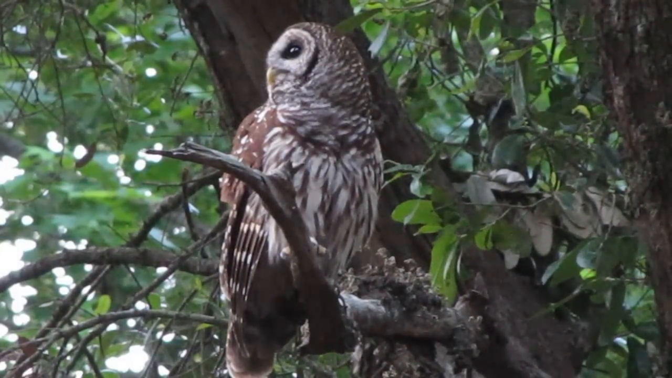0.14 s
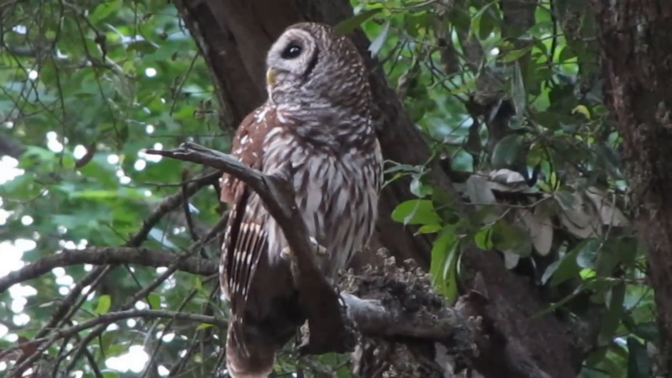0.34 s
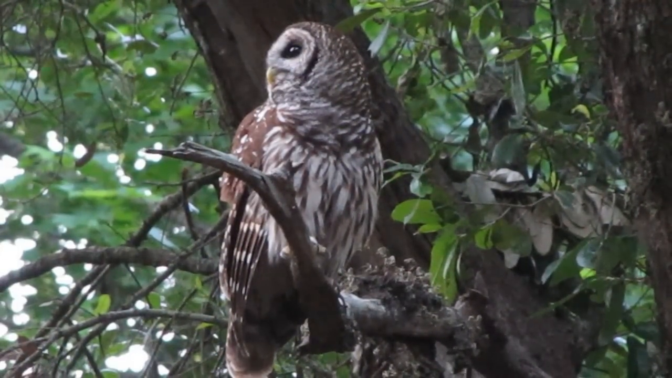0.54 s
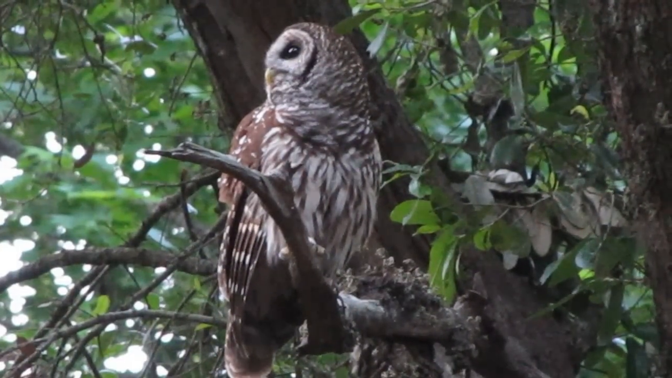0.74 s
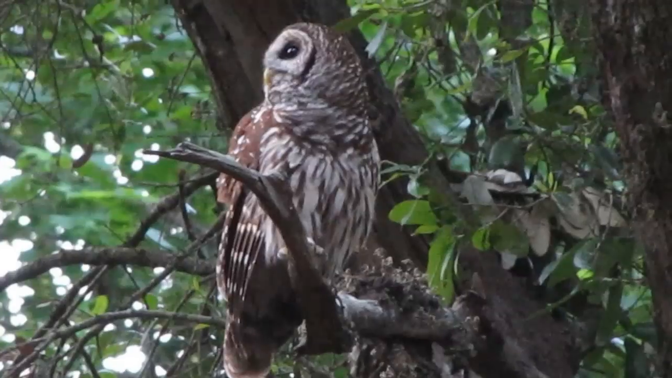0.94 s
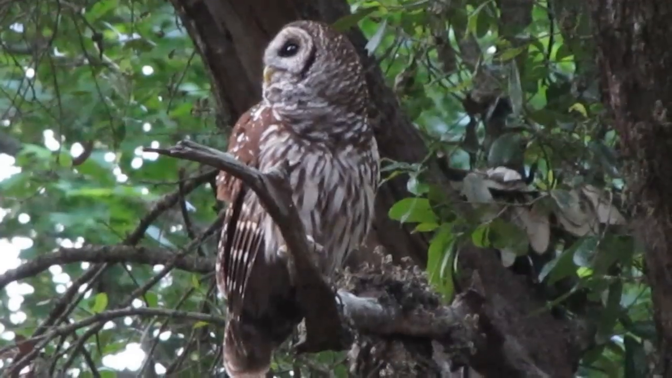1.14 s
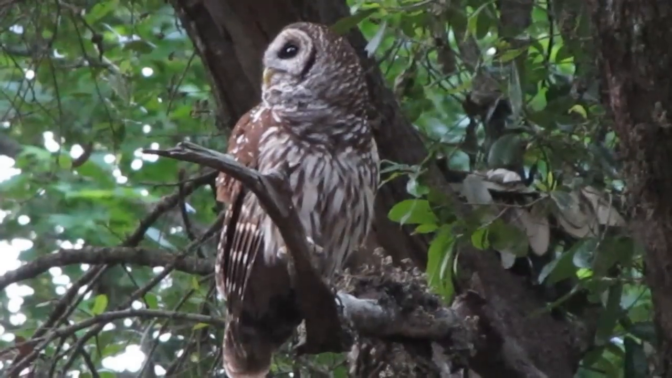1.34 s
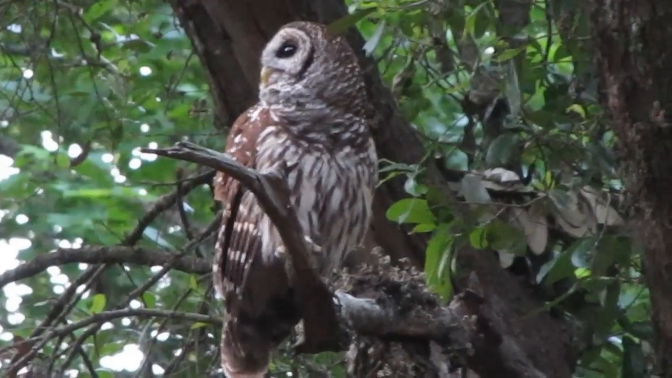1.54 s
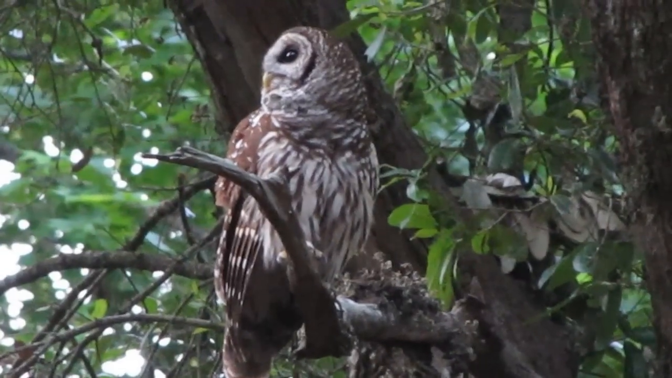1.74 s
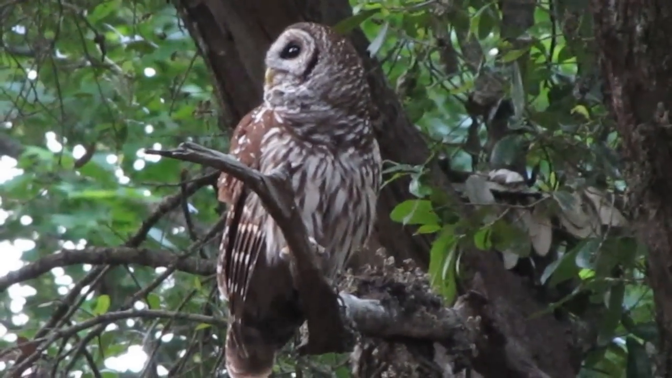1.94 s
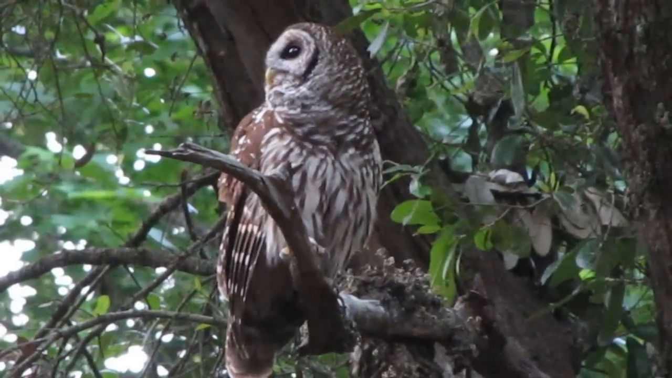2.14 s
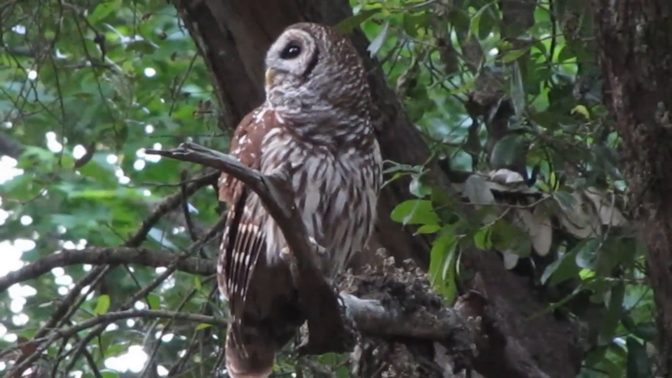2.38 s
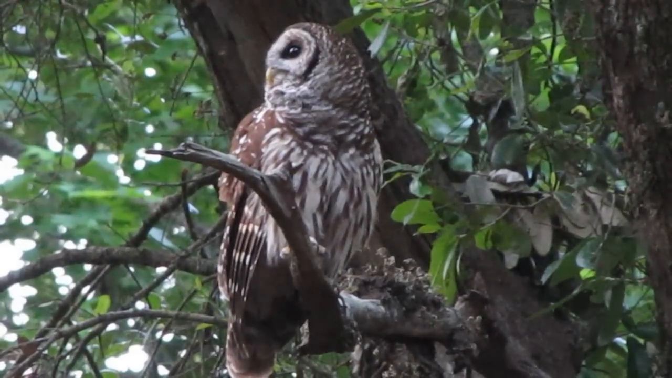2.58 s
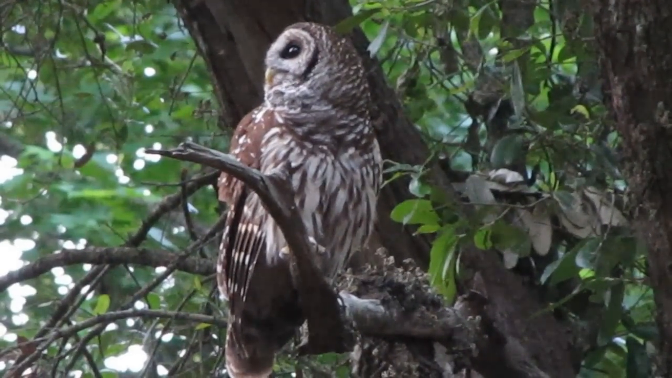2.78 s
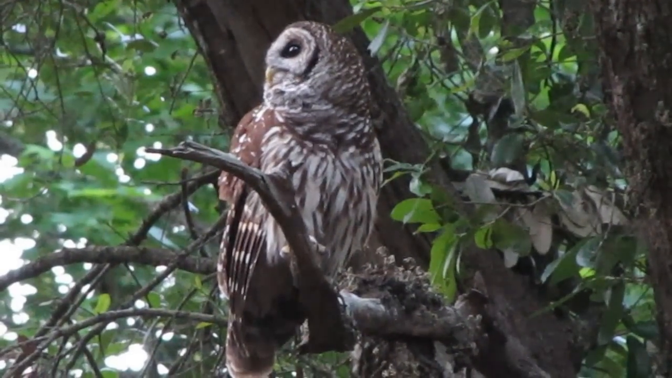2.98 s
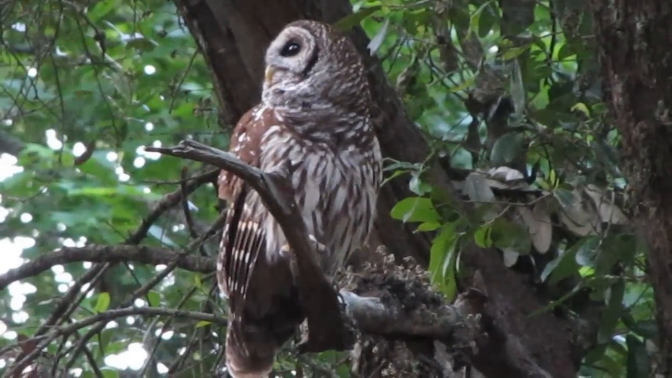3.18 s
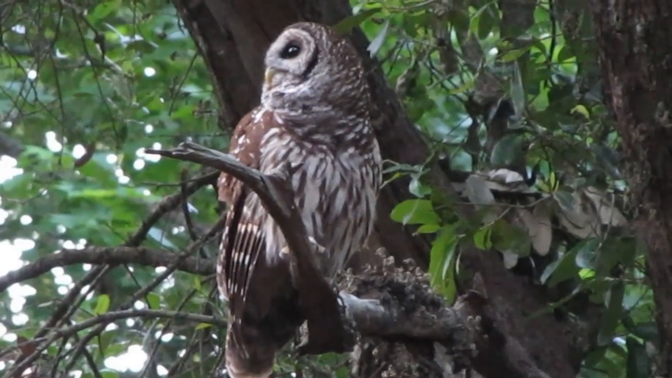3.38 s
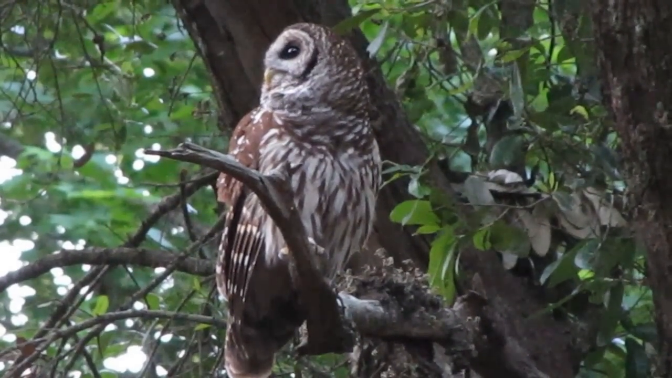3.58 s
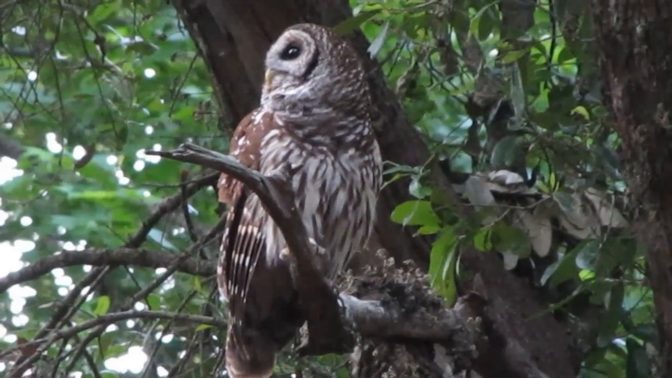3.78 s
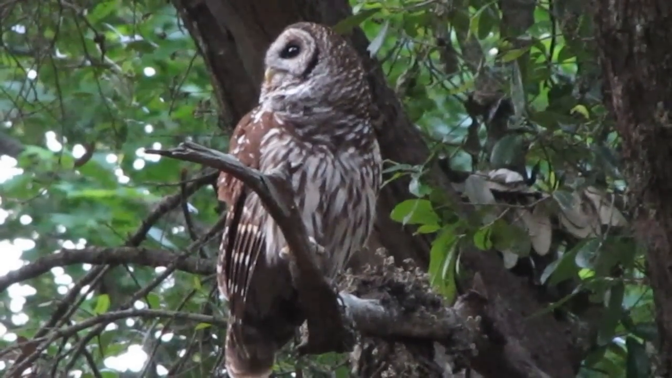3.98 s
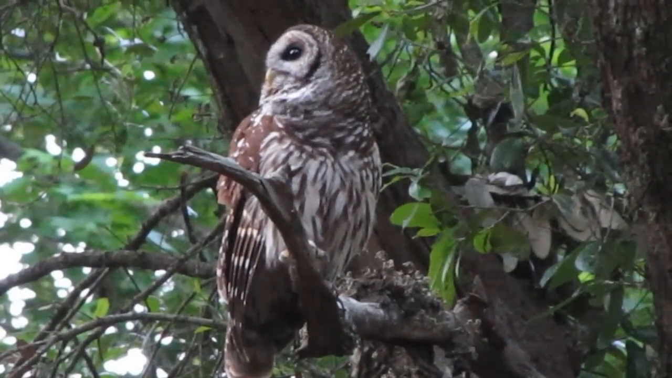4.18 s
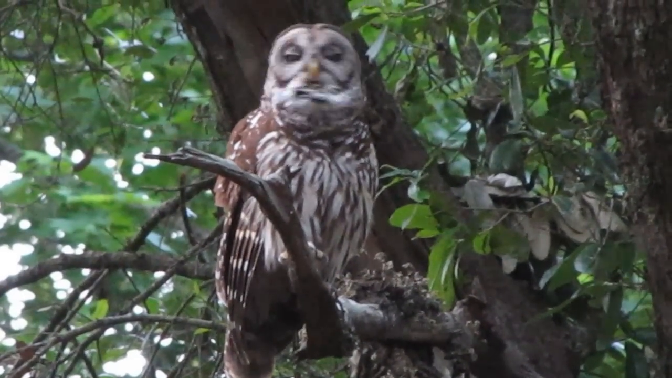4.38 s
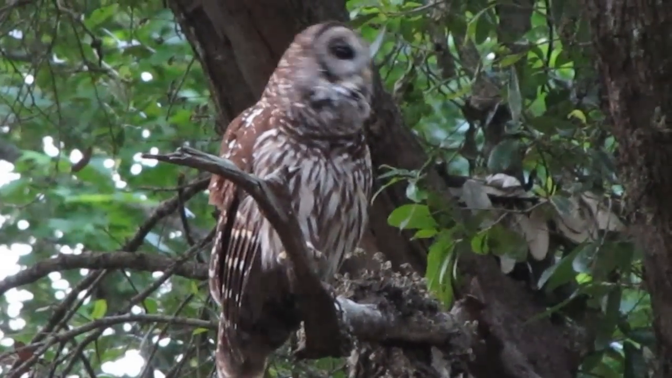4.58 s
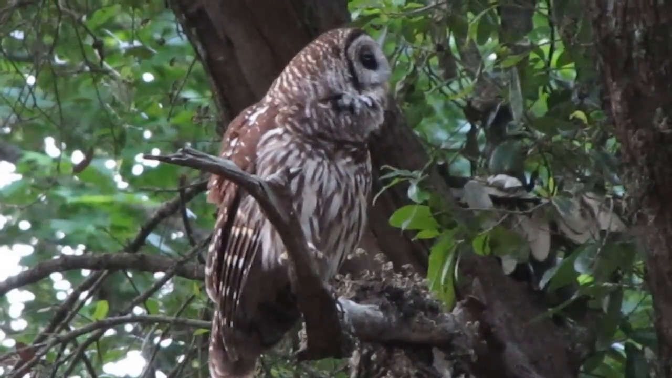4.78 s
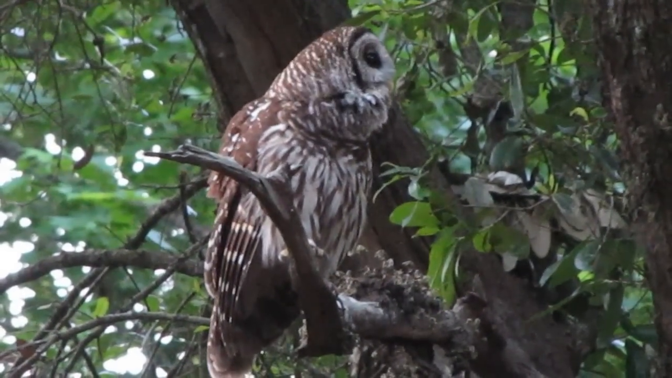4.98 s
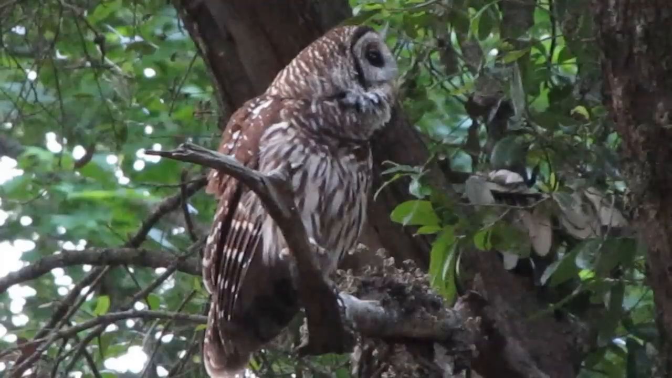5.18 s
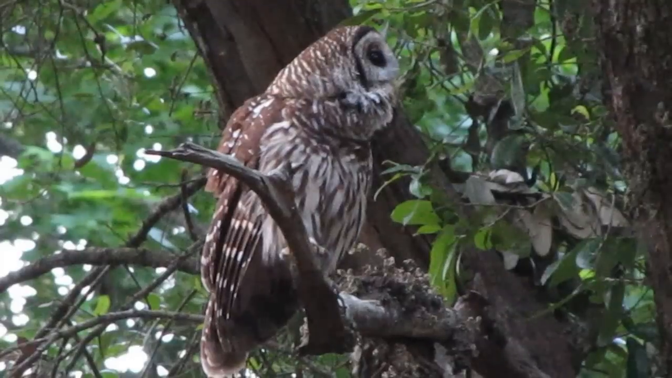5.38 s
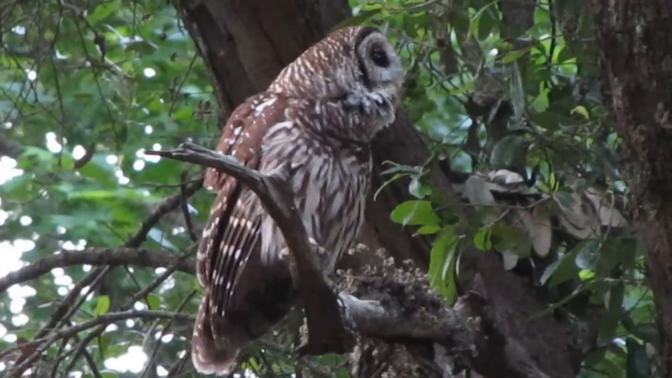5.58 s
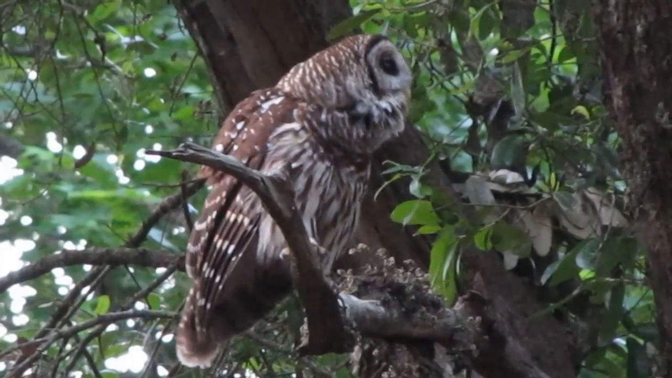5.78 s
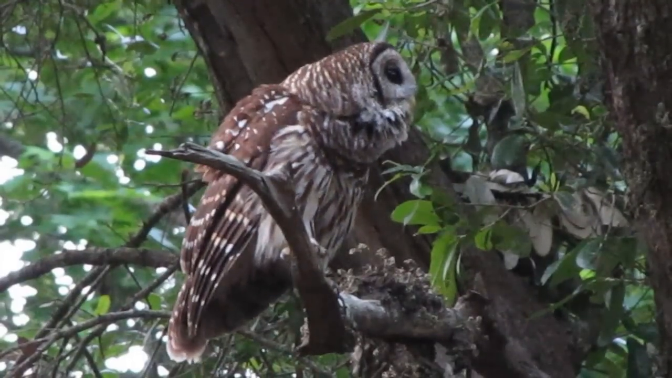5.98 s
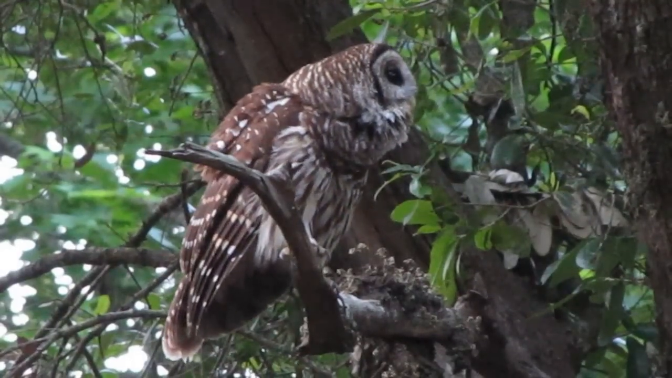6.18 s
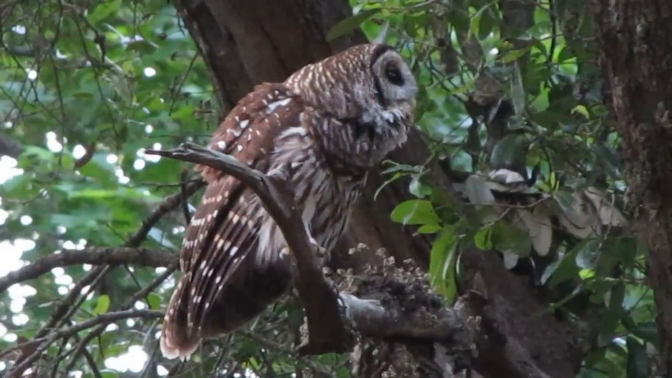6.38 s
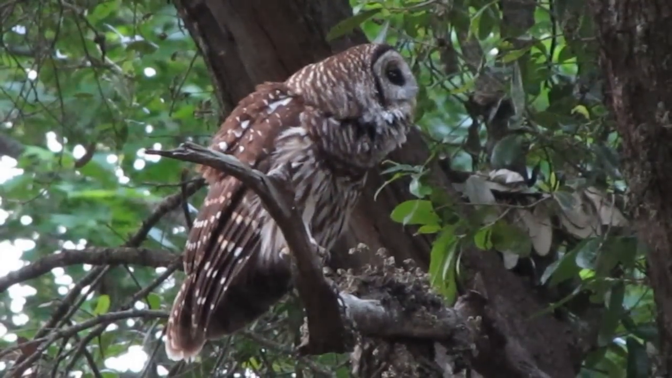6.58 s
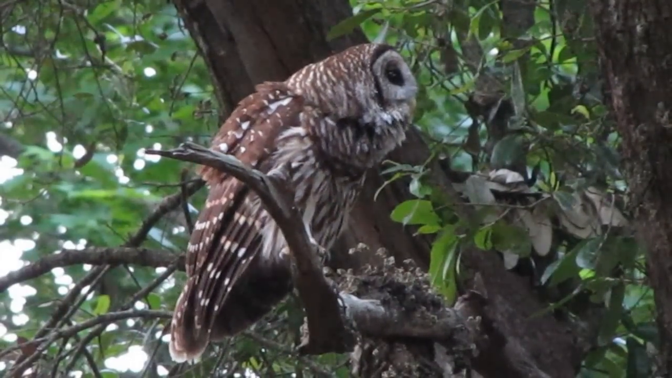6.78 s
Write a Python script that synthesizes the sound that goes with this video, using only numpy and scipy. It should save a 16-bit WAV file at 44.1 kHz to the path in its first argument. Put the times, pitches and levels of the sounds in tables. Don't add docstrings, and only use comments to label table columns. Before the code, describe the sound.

Outdoor stereo pickup among trees: continuous high insect buzz, soft air hiss and low far traffic. Short squirrel clucks come first, then clusters of bright bird chips, small wooden taps and leaf rustles. Harsh distant calls and thin whistles grow busier in the middle. A perched owl then hoots once, loud and nearly pure, cracking and sliding down into a fluttering coo, with scattered woodland echoes trailing afterward.

```python
import sys
import numpy as np
from scipy import signal
from scipy.fft import rfft, irfft
from scipy.io import wavfile
from scipy.ndimage import map_coordinates

SR = 44100
rng = np.random.default_rng(int(sys.argv[2]) if len(sys.argv) > 2 else 0)


def int16_out(signal):
    q = np.round(np.clip(np.atleast_2d(signal).T, -1, 1) * 32767)
    wavfile.write(sys.argv[1], SR, q.astype(np.int16))


def boost(x):
    u = np.asarray(x, float) / 20
    return 10 ** u


N = 301203
CLOCK = np.arange(N) / SR


def in_time(rows):
    s, *columns = np.transpose(rows)
    return [np.interp(CLOCK, s, c) for c in columns]


def at_hz(points, hz):
    table_hz, values = np.array(points)[:, 0], np.array(points)[:, 1]
    return np.interp(np.log(hz + 1), np.log(table_hz + 1), values)


def moment(centre_s, half_s, power=2):
    return np.exp(-((CLOCK - centre_s) / half_s) ** power)


def rms_one(x):
    return x / np.sqrt(np.mean(x ** 2) + 1e-20)


def drift(rate):
    knots = rng.standard_normal(int(N / SR * 200) + 2)
    return rms_one(map_coordinates(knots, [CLOCK * min(rate, 190)], order=3))


def cycle(hz):
    return np.sin(2 * np.pi * np.cumsum(hz) / SR)


def colour(x, spectrum):
    hz = np.arange(N // 2 + 1) * SR / N
    inside = (hz > spectrum[0][0]) & (hz < spectrum[-1][0])
    return rms_one(irfft(rfft(x) * boost(at_hz(spectrum, hz)) * inside, N))


def wide_noise(spectrum):
    # freq_hz, likeness [0-1]
    likeness = [(60, .93), (130, .75), (280, .5), (620, .45), (1340, .4), (2900, .15), (6000, .01),
                (14000, .01)]
    alike = np.clip(at_hz(likeness, np.arange(N // 2 + 1) * SR / N), 0, .99)
    mid, side = rfft(rng.standard_normal((2, N)))
    spread = np.sqrt(1 - alike) * side * [[1], [-1]]
    pair = colour(irfft(np.sqrt(1 + alike) * mid + spread, N), spectrum)
    return pair / np.std(pair.mean(axis=0))


def pan(x, db):
    return x * boost(np.array([[db / 2], [-db / 2]]))


def add(out, sound, s):
    i = max(round(s * SR), 0)
    out[..., i:i + sound.shape[-1]] += sound[..., :N - i]


def sweep(times, pitches, edge_s):
    t = np.arange(times[0], times[-1], 1 / SR)
    fade = np.clip(np.minimum(t - t[0], t[-1] - t) / edge_s, 0, 1)
    return np.sin(fade * np.pi / 2) * np.sin(2 * np.pi * np.cumsum(np.interp(t, times, pitches)) / SR)


def ring(hz, t60, rise_s):
    t = np.arange(SR // 10) / SR
    return np.sin(2 * np.pi * hz * t) * boost(-60 * t / t60) * (1 - np.exp(-t / rise_s))


def trees(x, t60, first_s, patchy, alike=0.19):
    t = np.arange(SR) / SR
    shared, *own = rng.standard_normal((3, SR)) * rng.exponential(1, (3, SR)) ** patchy
    echoes = np.sqrt(alike) * shared + np.sqrt(1 - alike) * np.array(own)
    echoes = echoes * boost(-60 * t / t60) * (t > first_s)
    echoes /= np.sqrt(np.sum(echoes ** 2, axis=1, keepdims=True))
    mono = np.atleast_2d(x).mean(axis=0, keepdims=True)
    return signal.fftconvolve(mono, echoes)[:, :N]


def owl():
    # time_s, pitch_hz
    glide = [(5.67, 669.6), (5.81, 685), (6.16, 661.4), (6.27, 645), (6.372, 566.6), (6.415, 539.2),
             (6.446, 388), (6.54, 338.8), (6.66, 312.2), (6.76, 276), (6.83, 210)]
    # time_s, effort_db
    effort = [
        (5.64, -40),
        (5.69, -28.5),
        (5.93, -22),
        (6.26, -22),
        (6.395, -17.5),
        (6.403, -18.5),
        (6.445, -21.5),
        (6.51, -27),
        (6.83, -45.5),
    ]
    # time_s, roughness [0-1]
    roughness = [
        (5.6, .02),
        (6.4, .02),
        (6.44, .3),
        (6.83, .35),
    ]
    # freq_hz, level_db
    throat = [(220, 3), (340, -1.5), (650, 0.5), (1000, -14.5), (1340, -30), (1900, -20.5), (2550, -20.5),
              (2950, -26.5), (3350, -29), (4800, -48)]
    (pitch,), (effort_db,), (rough,) = in_time(glide), in_time(effort), in_time(roughness)
    scoop_hz_per_s = 3500
    pitch = pitch - scoop_hz_per_s * np.clip(glide[0][0] - CLOCK, 0, .1)
    flutter = np.sin(2 * np.pi * np.cumsum(24 * (1 + 0.22 * drift(6.6))) / SR) + 0.38 * drift(60)
    phase = 2 * np.pi * np.cumsum(pitch * (1 + .06 * rough * flutter)) / SR

    overtones_db, follow, coo_db = -21.5, 0.36, -17.5
    voice_break = moment(6.421, .006)
    upper_db = overtones_db + follow * (effort_db - overtones_db) + coo_db * rough - 11 * voice_break
    levels = []
    for k in range(1, 12):
        source_db = upper_db if k > 1 else effort_db
        coo_bright_db = -6 * rough if k > 2 else 0
        levels.append(source_db + at_hz(throat, k * pitch) + coo_bright_db)
    levels[0] = levels[0] - 18 * rough - 6 * voice_break - 6.5 * moment(5.974, 0.016)
    levels[2] = levels[2] - 25 * np.clip((5.705 - CLOCK) / .01, 0, 1)
    levels[3:] = [db - 25 * np.clip((5.79 - CLOCK) / 0.05, 0, 1) for db in levels[3:]]

    voice = np.zeros(N)
    for k, db in enumerate(levels, 1):
        wobble_db = 11 * rough * np.tanh(drift(28))
        voice += boost(db + 2.5 + wobble_db) * np.sin(k * phase)
    voice += boost(levels[1] - 9) * rough * (1 + drift(50)) * np.sin(3 * phase / 2)
    voice *= np.clip((CLOCK - 5.632) / 0.033, 0, 1)
    return pan(voice, .3) + boost(-12.5) * trees(voice, 1.8, 0.013, patchy=0.55, alike=0.97)


def songbird():
    # top_s, from_hz, # top_hz, end_hz, level_db
    chips = [(0.004, 4200, 5180, 4060, -37), (0.032, 1513, 3770, 1690, -30),
             (2.116, 2990, 4870, 5000, -31.5), (2.16, 4500, 4980, 4750, -38), (2.19, 4600, 4950, 4800, -41),
             (2.305, 4700, 5140, 5000, -44), (2.34, 4780, 5070, 4950, -43), (2.209, 2890, 4480, 2710, -28),
             (2.274, 1496, 3956, 5200, -29), (2.331, 2360, 3490, 3300, -35.5),
             (2.356, 1616, 3940, 1780, -27), (2.457, 1390, 3586, 1640, -31.5),
             (4.542, 4200, 5270, 4800, -26), (4.546, 4940, 5600, 5500, -33), (4.6, 4750, 5080, 5000, -36),
             (4.623, 1500, 4470, 2170, -26.5), (4.702, 1486, 3466, 1660, -26.5),
             (4.783, 1816, 3060, 2650, -36), (4.832, 1815, 3410, 2110, -32.5)]
    climb_hz_per_s, fall_s, hold_s_per_khz = 300000, 0.007, 0.003
    dwell_s, shoulder = .0025, .12
    out = np.zeros(N)
    for s, from_hz, top_hz, end_hz, db in chips:
        rise = min((top_hz - from_hz) / climb_hz_per_s, s)
        fall = fall_s + hold_s_per_khz * max(end_hz / 1000 - 3.5, 0)
        times = [s - rise, max(s - dwell_s, s - rise / 2), s, s + dwell_s, s + fall + dwell_s]
        up, down = from_hz - top_hz, end_hz - top_hz
        pitches = top_hz + np.array([up, shoulder * up, 0, shoulder * down, down])
        swell_points = boost(np.array([-11, -4, 0, 0, -1]))
        swell = np.interp(np.arange(times[0], times[-1], 1 / SR), times, swell_points)
        octave = boost(-20) * sweep(times, 2 * pitches, .003)
        add(out, boost(db) * swell * (sweep(times, pitches, 0.00021) + octave), s - rise)
    bright = signal.sosfilt(signal.butter(2, 3300, "high", fs=SR, output="sos"), out)
    near = boost(4.0) * trees(bright, 0.07, 0.0012, patchy=0.17, alike=0.25)
    far_bright = boost(2.5) * trees(bright, 0.85, 0.018, patchy=0.69)
    far = boost(-8.5) * trees(out, 0.88, 0.012, patchy=0.51)
    return pan(out, -3.5) + near + far_bright + far


def cricket():
    # start_s, pulses [count], level_db
    trills = [
        (.15, 24, -39),
        (1.849, 23, -39),
        (3.392, 23, -39),
        (5.053, 25, -39),
        (6.72, 4, -39),
    ]
    strokes_per_s, stroke_s = 27.38, .009
    stroke = sweep([0, stroke_s], [5900, 5500], 0.0038)
    out = np.zeros(N)
    for s, pulses, db in trills:
        for k, (chance, late) in enumerate(rng.standard_normal((30, 2))[:round(pulses)]):
            stroke_db = db + 1.5 * chance - 6.5 * np.exp(-k / 2.0)
            add(out, boost(stroke_db) * stroke, s + k / strokes_per_s - stroke_s / 2 + late / 4000)
    return pan(out, 10.4) + boost(-9) * trees(out, 0.058, 0.0011, patchy=4.5)


def squirrel():
    # time_s, peak_db
    stray_clucks = [
        (0.175, -43),
        (1.232, -30.5),
        (1.3067, -31.5),
        (1.4588, -37),
    ]
    start_s, gap_s, slowing_s, hz = .334, .0655, .00025, 1102
    run = [(start_s + gap_s * k + slowing_s * k * k, -38.5 + 1.9 * min(k, 4)) for k in range(13)]
    cluck = ring(hz, 0.012, 0.00035) + boost(-6.5) * ring(1.76 * hz, 0.024, 0.0022)
    out = np.zeros(N)
    for s, db in run + stray_clucks:
        add(out, boost(db + 1.5) * cluck, s)
    return pan(boost(2.5) * out, -1) + boost(-3) * trees(out, .3, .006, patchy=.8)


def knocks():
    # time_s, peak_db, low_mode_hz, left_right_db, crack_db re peak
    blows = [(1.462, -41, 704, -2, -9), (1.801, -46, 710, 5, -3), (1.997, -39, 760, -9, 4),
             (2.715, -29, 794, 5, -8), (3.035, -36.5, 680, -3, 9.5), (3.054, -38, 690, -9, -1),
             (3.417, -38, 726, -3, 7), (3.529, -48, 795, -3, 12), (4.308, -28.5, 736, 6, -21),
             (4.322, -33.5, 640, -1, -2), (4.719, -41, 690, 12, -8), (4.786, -27.5, 676, 2, -22),
             (5.012, -32, 966, -13, -8), (5.7038, -32, 1010, -9, -6)]
    out = np.zeros((2, N))
    decay = boost(-60 * np.arange(600) / SR / 0.03)
    for (s, db, low_hz, side_db, crack_db), noise in zip(blows, rng.standard_normal((len(blows), 600))):
        crack = signal.lfilter([.1, .1, -.1, -.1], [1, -1.7, .77], noise * decay)
        add(out, pan(boost(db) * ring(low_hz, 0.032, 0.000086), side_db), s)
        add(out, pan(boost(db) * ring(1.525 * low_hz, 0.018, 0.00017), side_db), s)
        add(out, pan(boost(db + crack_db + 3) * crack, side_db), s)
    return out + boost(-4.0) * trees(out, 0.033, 0.0061, patchy=1.1)


def bumps():
    # time_s, peak_db, mode_hz
    thumps = [
        (0.898, -41, 274),
        (1.457, -46, 191),
        (1.639, -46, 187),
        (1.996, -48, 161),
        (5.448, -42.5, 305),
    ]
    # time_s, level_db, mode_hz
    tick = (5.7036, -21, 8700)
    out = np.zeros(N)
    for s, db, hz in thumps:
        add(out, boost(db + 2.5) * ring(hz, 0.093, 0.0027), s)
    tick_s, tick_db, tick_hz = tick
    snap = ring(tick_hz, .006, .0002)
    snap = snap + .4 * ring(1.35 * tick_hz, .004, .0002) + .3 * ring(.7 * tick_hz, .004, .0002)
    add(out, boost(tick_db) * snap, tick_s)
    return pan(out, -.5)


def whistlers():
    # start_s, end_s, from_hz, to_hz of the strong fifth partial, level_db
    call_lines = [(.265, 0.296, 2150, 2160, -55), (3.594, 3.628, 2010, 2030, -47),
                  (3.655, 3.79, 1995, 2026, -47.5), (3.845, 3.966, 2130, 2030, -53),
                  (3.972, 4.081, 2010, 1900, -56), (4.175, 4.216, 2090, 2170, -57),
                  (4.235, 4.307, 2170, 2060, -55), (4.313, 4.37, 2210, 1975, -52),
                  (4.379, 4.414, 1900, 2050, -45), (4.415, 4.603, 1920, 1870, -51.5),
                  (4.639, 4.9, 2070, 1890, -47), (4.894, 4.982, 1954, 1990, -53), (4.98, 5.078, 1956, 2045, -51)]
    # multiple [of fundamental], level_db
    call_partials = [
        (4, -9),
        (5, 0),
        (6, -13),
        (7, -11),
    ]
    # start_s, end_s, from_hz, to_hz, level_db
    warbles = [(.001, .022, 1960, 1960, -48.5), (.045, 0.192, 1900, 1834, -58),
               (.09, 0.204, 3120, 3240, -55), (.15, 0.297, 2740, 2880, -54),
               (0.286, 0.328, 3350, 3600, -47), (0.328, .41, 3560, 3500, -53),
               (0.312, .395, 2320, 2460, -59), (.33, 0.403, 3020, 2950, -61), (.41, 0.426, 2800, 2930, -47),
               (0.754, 0.81, 2270, 2500, -57), (1.005, 1.13, 3150, 3060, -61),
               (1.665, 1.723, 2850, 3370, -58), (1.69, 1.718, 2420, 2610, -57),
               (1.716, 1.83, 2610, 2660, -50.5), (1.754, 1.834, 1770, 1750, -57),
               (1.81, 1.87, 3460, 3650, -62), (1.971, 2.04, 2520, 2970, -53),
               (2.038, 2.133, 3050, 2965, -51.5), (2.02, 2.093, 2790, 2890, -51),
               (2.577, 2.717, 2600, 2880, -57), (3.182, 3.277, 3600, 3050, -54),
               (3.5, 3.607, 2523, 2500, -59.5), (3.585, 3.706, 2900, 2850, -56),
               (3.77, 3.872, 3230, 2970, -53), (3.82, 3.903, 2880, 2480, -57),
               (3.878, 4.0, 2874, 2920, -56.5), (3.878, 3.985, 1640, 1652, -56),
               (4.019, 4.093, 2900, 2790, -53), (4.344, 4.42, 2520, 2610, -56),
               (4.09, 4.16, 2840, 2900, -58), (3.9, 3.98, 2470, 2430, -61), (4.362, 4.4, 1596, 1850, -49),
               (4.57, 4.607, 1120, 1310, -36), (4.985, 5.086, 1570, 1640, -56),
               (5.296, 5.606, 2880, 3190, -57.5), (5.985, 6.026, 2700, 2980, -48),
               (6.017, 6.065, 2980, 2870, -44), (6.143, 6.204, 2950, 2850, -49),
               (6.2, 6.738, 2820, 2770, -49.5), (6.557, 6.69, 3000, 3120, -49)]
    # start_s, length_s, pitch_hz, level_db
    peeps = [
        (0.31, 0.067, 7500, -47),
        (1.268, 0.019, 6830, -46),
        (1.75, .08, 7030, -57),
        (4.243, .03, 3300, -49),
        (4.31, 0.013, 3250, -44),
        (4.376, .024, 3350, -44),
        (4.43, 0.011, 3320, -50),
        (4.517, 0.025, 1280, -44.5),
        (4.518, 0.038, 7180, -45.5),
    ]
    caller_pan_db, warbler_pan_db, peeper_pan_db = -7, -4.5, -4
    notes = []
    for start, end, from_hz, to_hz, db in call_lines:
        for k, part_db in call_partials:
            notes.append((start, end, from_hz * k / 5, to_hz * k / 5, db + part_db, caller_pan_db))
    notes += [(*row, warbler_pan_db) for row in warbles]
    notes += [(s, s + length, hz, 0.99 * hz, db, peeper_pan_db) for s, length, hz, db in peeps]
    out = pan(boost(-61) * np.sin(2 * np.pi * 887 * CLOCK), -10)
    for start, end, from_hz, to_hz, db, side_db in notes:
        whistle = sweep([start, end], [from_hz, to_hz], 0.0015)
        add(out, pan(boost(db + 4.0) * whistle, side_db), start)
    wavering = np.arange(N) + 2.3 * drift(55) + 7 * drift(9)
    out = np.array([map_coordinates(side, [wavering], order=3) for side in out]) * boost(2.2 * drift(55))
    return out + boost(-7) * trees(out, .4, .012, patchy=.7, alike=.3)


def raspers():
    # start_s, end_s, throat_low_hz, throat_high_hz, level_db
    rasps = [(0.001, 0.205, 1700, 3930, -59), (0.196, 0.425, 2030, 3730, -53),
             (2.05, 2.754, 2080, 3600, -49), (3.171, 3.437, 2300, 3440, -51),
             (3.555, 3.86, 1620, 3970, -43), (3.841, 4.18, 1660, 3200, -51),
             (4.335, 4.725, 1580, 3530, -38), (4.749, 5.13, 1520, 3370, -42),
             (5.093, 5.732, 2530, 3090, -50.5), (5.971, 6.46, 2340, 3270, -59),
             (6.462, 6.805, 1810, 3750, -44)]
    pulse_hz = 401.2
    out = np.zeros(N)
    wobble = 1 + .008 * drift(40) + .015 * drift(7)
    breath = 0.17 * rng.standard_normal(N)
    for start, end, low_hz, high_hz, db in rasps:
        span = slice(round(start * SR), round(end * SR))
        pulses = np.diff(np.floor(np.cumsum(pulse_hz * wobble[span]) / SR), prepend=0) + breath[span]
        throat_band = signal.butter(3, [low_hz, high_hz], "band", fs=SR, output="sos")
        call = signal.sosfilt(throat_band, pulses - pulses.mean())
        add(out, boost(db) * rms_one(call) * signal.windows.tukey(len(call), .35), start)
    return trees(out * boost(2.5 * drift(22)), .3, 0, patchy=.3, alike=.4)


def leaves():
    # time_s, level_db
    hops = [
        (0.0, -65),
        (1.75, -55.5),
        (2.12, -52),
        (2.5, -62),
        (3.63, -63.5),
        (4.53, -51),
        (6.64, -66),
    ]
    # freq_hz, level_db per Hz
    rustle = [(4700, -19), (5300, 7.5), (6500, 0), (8000, 0), (10500, -7.5), (11500, -20)]
    rise_db_per_s, fall_db_per_s, still_db = 110, 35, -59
    stir = boost(still_db)
    for s, db in hops:
        stir = stir + boost(db + np.minimum(rise_db_per_s * (CLOCK - s), fall_db_per_s * (s - CLOCK)))
    return stir * boost(2.0 * drift(15)) * wide_noise(rustle)


def cicadas():
    # freq_hz, level_db per Hz
    buzz = [(2060, -44), (3500, -54), (3730, -23), (3860, -11.5), (3890, -22), (3970, -4), (4380, 2.5),
            (4580, 0), (4700, -17.5), (4840, -14), (5320, -13), (5750, -15.5), (6300, -25.5), (8190, -71),
            (13900, -120)]
    # freq_hz, level_db per Hz
    upper_buzz = [(8300, -13), (8850, -2.5), (9400, -20), (12200, -48), (13000, -16.5), (13700, -29)]
    throb_per_s = 38
    beat = cycle(throb_per_s * (1 + 0.036 * drift(2.515)))
    chorus = boost(-41 + 0.5 + 1.3 * beat + 0.49 * drift(15)) * wide_noise(buzz)
    overtones = boost(-63 + 4.5 * beat + drift(1.5)) * wide_noise(upper_buzz)
    return pan(chorus, 1.7) + pan(overtones, 0.93)


def background():
    # freq_hz, level_db per Hz
    engines = [(11, -51), (18, -12), (32, -13), (35, -14), (42, -10.5), (65, -1), (87, -3), (118, -6),
               (166, -8.5), (255, -6.5), (297, -7.5), (422, -6), (548, -8), (619, -11.5), (700, -42),
               (910, -46), (1540, -120)]
    # freq_hz, level_db per Hz
    tyres = [(380, -49), (650, -3.5), (724, -10), (839, -2), (860, -10), (909, 0.5), (1000, -4.5),
             (1090, 4.5), (1210, -8.5), (1500, -12), (1950, -12.5), (3300, -120)]
    # freq_hz, level_db per Hz
    hiss = [(1250, -0.5), (1500, -7), (2000, -0.5), (2600, 2), (3200, 0.5), (3800, -3), (6300, -7.5),
            (8000, -11), (10000, -10), (12000, -15), (13800, -13)]
    # time_s, swell_db
    swells = [
        (.85, 1.9),
        (3.55, 2.3),
        (4.55, 5.3),
        (6.5, 2.8),
    ]
    rumble = boost(-54.5 + drift(1.0) / 2) * wide_noise(engines)
    swell_db = sum(db * moment(s, 0.13) for s, db in swells)
    hum = boost(-50.5 + swell_db + 0.89 * drift(12)) * wide_noise(tyres)
    return pan(rumble, -.7) + pan(hum, -1.5) + pan(boost(-51.5) * wide_noise(hiss), 0.65)


def scene():
    birds = owl() + songbird() + whistlers() + raspers() + leaves()
    return birds + cricket() + squirrel() + cicadas() + knocks() + bumps() + background()


def band_limit(x):
    return signal.sosfilt(signal.butter(12, 14370, fs=SR, output="sos"), x)


def record(dry):
    # time_s, half_width_s, level_db
    treble_dips = [
        (3.045, 0.01, -15.5),
        (4.304, 0.015, -3.5),
    ]
    mains_hz, mains_db, left_lag_samples = 59.5, -62, 2
    hum = boost(mains_db + 1.5 + 2.2 * drift(4.13)) * np.sin(2 * np.pi * mains_hz * CLOCK)
    gaps_db = sum(db * moment(s, half_s, 4) for s, half_s, db in treble_dips)
    bass = signal.sosfiltfilt(signal.butter(2, 1300, fs=SR, output="sos"), dry)
    gapped = bass + boost(gaps_db) * (dry - bass)
    pair = np.array([np.roll(gapped[0], left_lag_samples), gapped[1]]) + hum
    dull = signal.sosfilt(signal.cheby2(14, 60, 14350, fs=SR, output="sos"), pair)
    return band_limit(dull)


dry = scene()
out = record(dry)
int16_out(out)
```